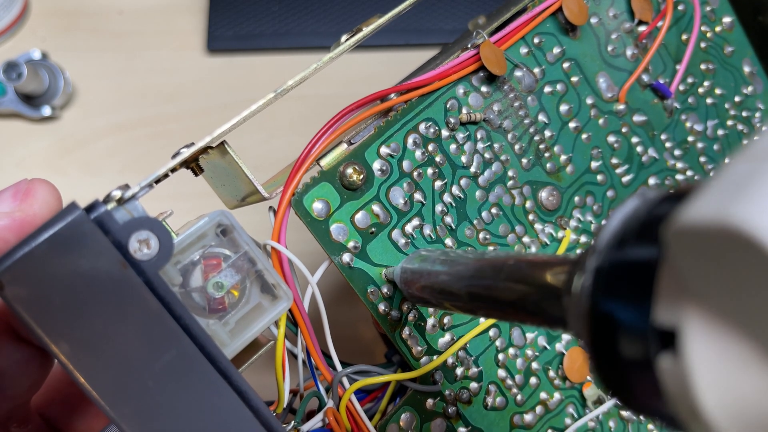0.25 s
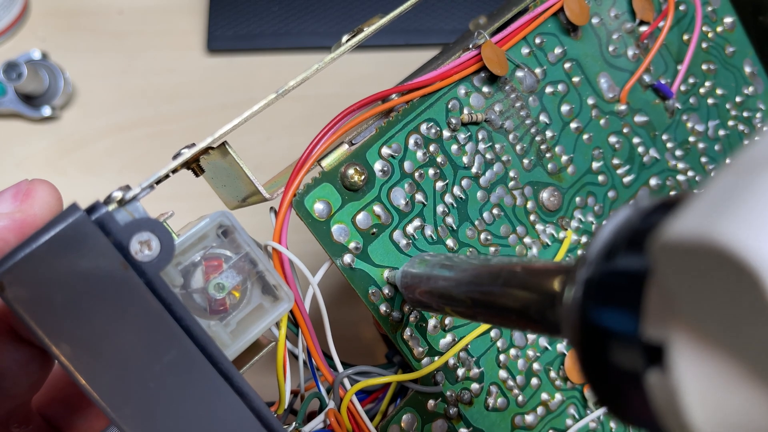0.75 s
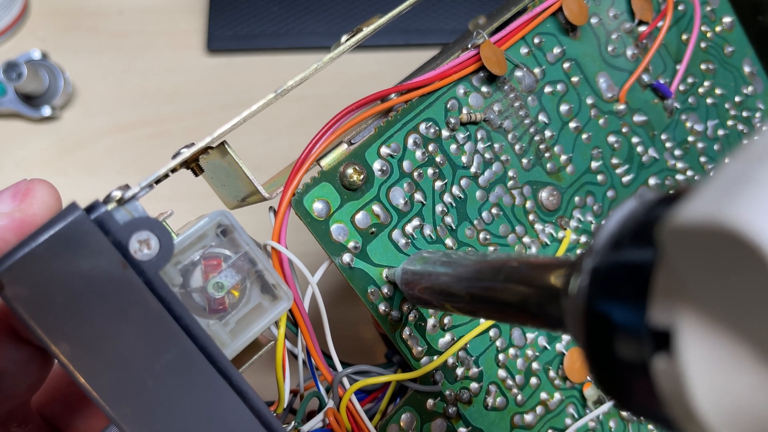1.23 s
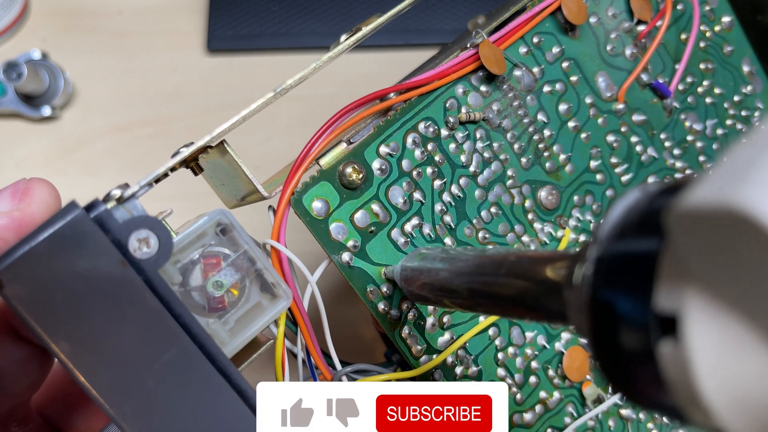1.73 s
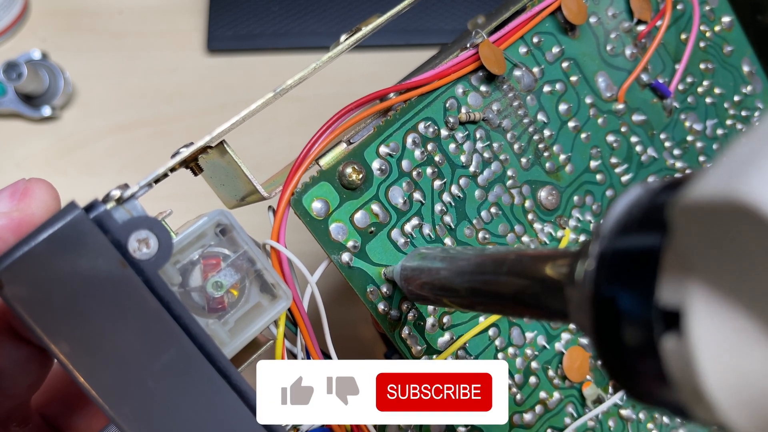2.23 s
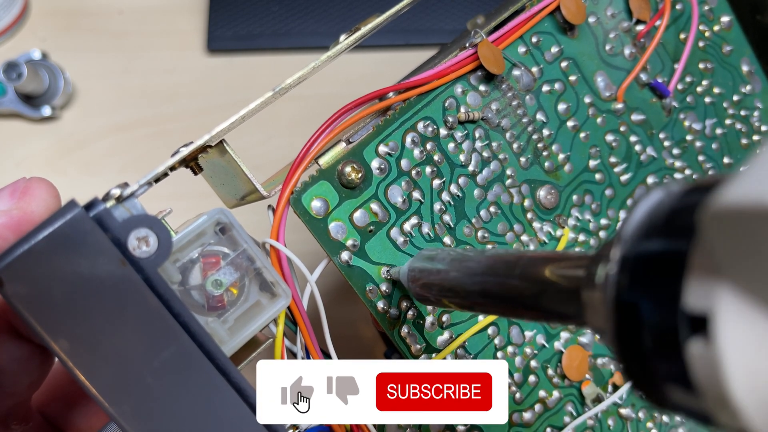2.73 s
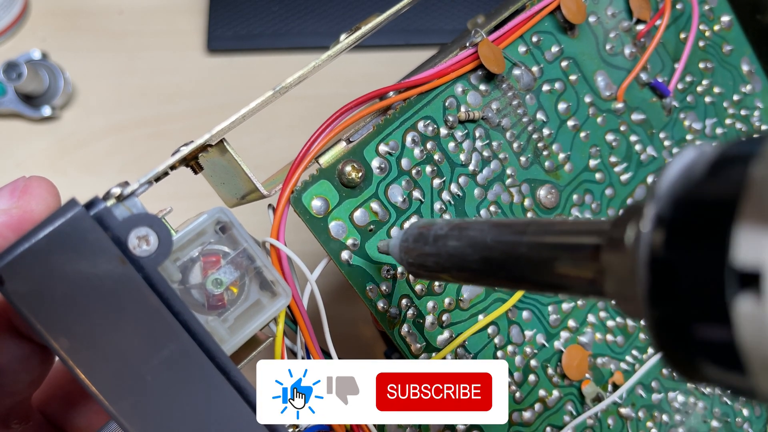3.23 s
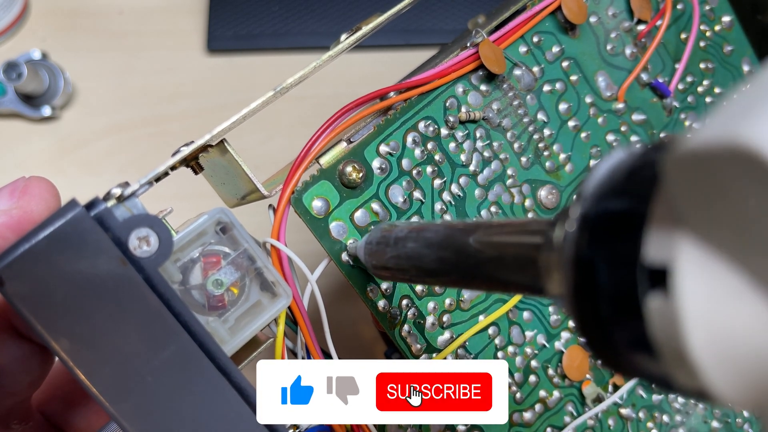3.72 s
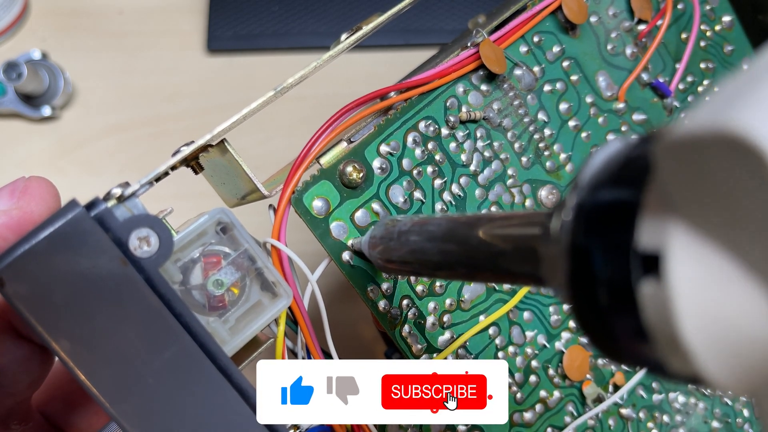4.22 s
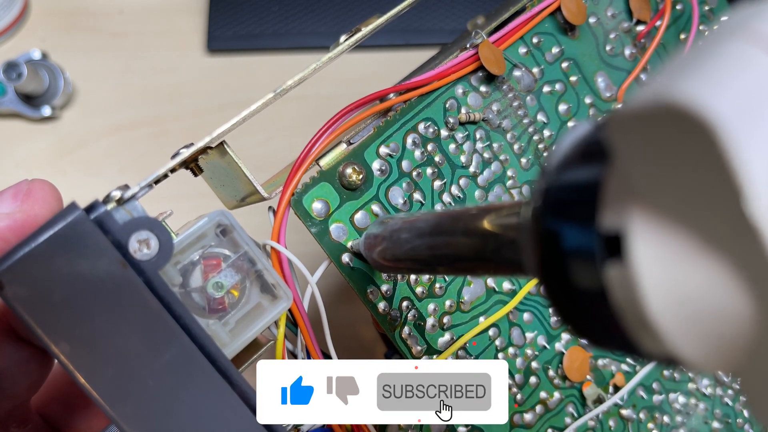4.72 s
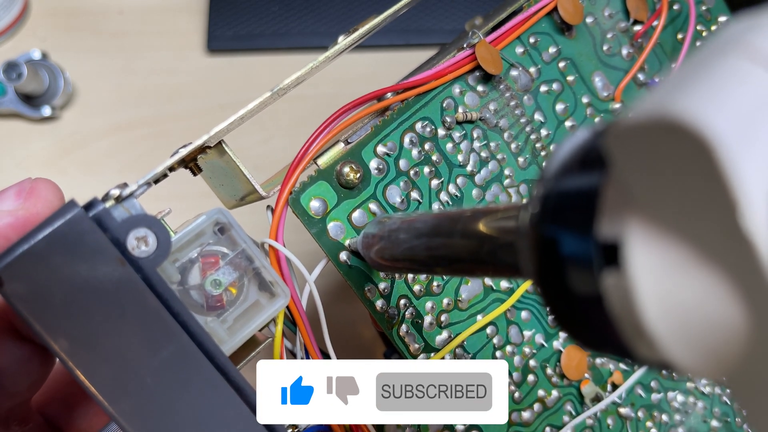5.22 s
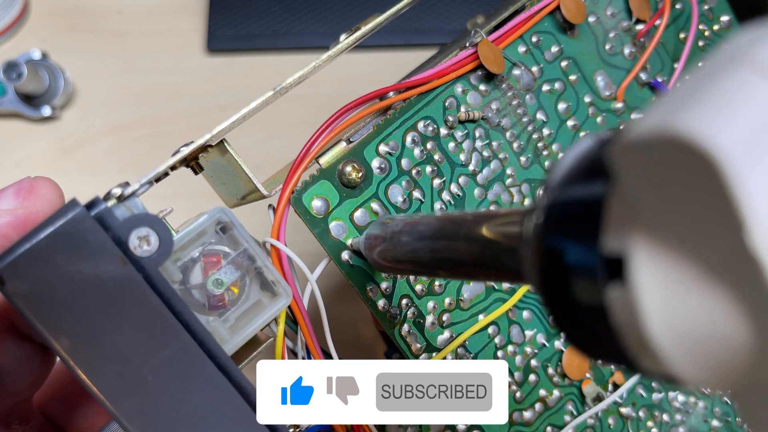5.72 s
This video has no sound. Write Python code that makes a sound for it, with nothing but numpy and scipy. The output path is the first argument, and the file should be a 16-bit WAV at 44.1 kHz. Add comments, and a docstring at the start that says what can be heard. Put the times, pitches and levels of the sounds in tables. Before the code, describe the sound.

Faint ticks on a circuit board, a short buzzing hum from a desoldering pump ending in a sharp click, then a workbench clatter.

```python
"""A desoldering gun's diaphragm pump spins up, hums, slaps its valve and sucks air through the nozzle.
The trigger snaps it on and off; molten solder gurgles and sputters, and air rushes back on release.
Before that, the tip ticks and scuffs on a circuit board, hot flux whistles and the bench knocks softly.
Later something on the bench shifts with a short clatter and light taps, and the next joint sizzles.
Under it all lies a quiet room with faint mains hum, handling rustle and a slow draught."""
import sys
import numpy as np
from scipy import signal
from scipy.fft import rfft, irfft, next_fast_len
from scipy.io import wavfile

SR = 44100
rng = np.random.default_rng(int(sys.argv[2]) if len(sys.argv) > 2 else 0)


def master_out(mix):
    """Clip the mix to full scale and print it as 16-bit PCM to the path in sys.argv[1]."""
    frames = np.transpose(np.atleast_2d(mix))
    ceiling = np.clip(frames, -1, 1)
    pcm = np.round(ceiling * 32767).astype(np.int16)
    wavfile.write(sys.argv[1], SR, pcm)


N = 262703
TIME = np.arange(N) / SR
PRESS_S, RELEASE_S = 1.431, 2.717  # the motor has power while the trigger is held


def from_db(db):
    """Decibels to gain."""
    return 10 ** (np.asarray(db) / 20)


def rms_one(x):
    """Scale to an rms of 1."""
    return x / np.sqrt(np.mean(x ** 2) + 1e-20)


def drift(rate_hz):
    """Smooth random modulation with a spread of 1."""
    hop, warm_up = 40, 2000
    pole = np.exp(-2 * np.pi * rate_hz * hop / SR)
    white = rng.standard_normal(N // hop + warm_up + 2)
    slow = signal.lfilter([1], [1, -2 * pole, pole * pole], white)[warm_up:]
    return np.interp(np.arange(N) / hop, np.arange(len(slow)), rms_one(slow))


def noise(colour):
    """Noise with the given spectrum, falling 24 dB an octave past its ends; rms 1."""
    size = next_fast_len(N)
    octave = np.log2(np.maximum(np.arange(size // 2 + 1) * SR / size, 1))
    hz, db = np.transpose(colour)
    outside = np.abs(octave - np.clip(octave, np.log2(hz[0]), np.log2(hz[-1])))
    gain = from_db(np.interp(octave, np.log2(hz), db) - 24 * outside)
    return rms_one(irfft(rfft(rng.standard_normal(size)) * gain, size)[:N])


def resonant(x, modes):
    """Noise with narrow resonances standing out of it; rms 1."""
    peaks = sum(from_db(db) * signal.lfilter(*signal.iirpeak(hz, hz / width, fs=SR), x)
                for hz, width, db in modes)
    return rms_one(x + peaks)


def ring(clicks, hz, t60_s):
    """A unit click sets a sine of height 1 ringing."""
    pole, angle = from_db(-60 / (t60_s * SR)), 2 * np.pi * hz / SR
    return signal.lfilter([0, np.sin(angle)], [1, -2 * pole * np.cos(angle), pole * pole], clicks + 1e-18)


def impulses(times, gains):
    """One click of the given height at each time."""
    return np.bincount(np.round(np.asarray(times) * SR).astype(int), gains, N)[:N]


def struck(times, db, modes):
    """Every contact rings all the modes, each with a slightly different strength."""
    scatter_db = rng.standard_normal((len(times), len(modes)))
    return sum((-1) ** k * ring(impulses(times, from_db(scatter_db[:, k] + db + mode_db)), hz, t60_s)
               for k, (hz, mode_db, t60_s) in enumerate(modes))


def dying(times, db, t60_s, rise_s):
    """Envelope of blows whose energies add up and die away."""
    blows = impulses(times, from_db(db) ** 2) + 1e-24
    energy = signal.lfilter([1], [1, -from_db(-120 / (t60_s * SR))], blows)
    attack = np.exp(-1 / (rise_s * SR))
    return signal.lfilter([1 - attack], [1, -attack], np.sqrt(energy))


def swell(centre_s, half_length_s):
    """A smooth bump of height 1 around a moment."""
    return np.exp(-((TIME - centre_s) / half_length_s) ** 2)


def swells(rows):
    """Envelope of several smooth bumps, each with its own length and level."""
    return sum(from_db(db) * swell(centre_s, half_length_s) for centre_s, half_length_s, db in rows)


def boost(centre_s, half_length_s, db):
    """A gain that rises briefly above 1."""
    return from_db(db * swell(centre_s, half_length_s))


def rising(start_s, rise_s):
    """0 until the start, then settling towards 1."""
    return 1 - np.exp(-np.maximum(TIME - start_s, 0) / rise_s)


# dark room tone: freq_hz, level_db
ROOM_COLOUR = [(60, -8), (110, -4), (150, -8), (200, -3), (270, -6.5), (360, -6.5), (440, -10),
               (650, -18.5), (950, -19.5), (1800, -22), (2150, -22.5), (2700, -28), (5000, -32.5),
               (10500, -34.5), (16000, -38)]
# resonances in the room tone: pitch_hz, width_hz, level_db
ROOM_MODES = [(708, 26, -1), (1436, 26, 0), (2000, 60, 2), (2420, 32, 0), (2950, 33, -4)]
# mains hum and two fainter tones: pitch_hz, level_db
ROOM_TONES = [(120, -66.5), (322, -71), (380, -72)]

def room(level_db=-59):
    """A bed of soft noise and hum, wavering slightly."""
    bed = from_db(level_db + 0.56 * drift(6.8)) * resonant(noise(ROOM_COLOUR), ROOM_MODES)
    for hz, db in ROOM_TONES:
        peak = np.sqrt(2) * from_db(db + 1.9 * drift(1.17))
        bed += peak * np.sin(2 * np.pi * hz * TIME + hz / 250 * drift(3))
    return bed


# hand movements: centre_s, half_length_s, level_db
HAND_MOVES = [(.75, 0.7, -61), (4.63, 0.3, -64), (5.5, 0.58, -61.5)]
# soft handling rustle: freq_hz, level_db
RUSTLE_COLOUR = [(150, -10), (350, 13), (700, -1), (1100, 1.5), (2200, -3), (3000, -5.5), (8000, -16.5)]

def rustle(grip_db=-73):
    """The resting grip rustles faintly, and more as the hands shift gun and board."""
    envelope = np.hypot(from_db(grip_db), swells(HAND_MOVES))
    return envelope * from_db(1.9 * drift(26)) * noise(RUSTLE_COLOUR)


# wafts from the moving gun: centre_s, half_length_s, level_db
WAFTS = [(.95, 0.43, -48), (1.75, 0.087, -43.5), (2.15, 0.1, -44), (5.9, .25, -48.5)]
# sub-bass air rumble: freq_hz, level_db
DRAUGHT_COLOUR = [(6, -0.5), (12, -5), (20, -9.5), (30, -18), (50, -21.5), (80, -38.5)]

def draught(level_db=-55, wander_db=2):
    """Slow air movement swells when the gun stirs the air close by."""
    envelope = np.hypot(from_db(level_db), swells(WAFTS))
    return envelope * from_db(wander_db * drift(3.9)) * noise(DRAUGHT_COLOUR)


# nozzle ticks on the joints: start_s, snap_db, ring_db
TICKS = [(0.2883, -49, -43.5), (0.295, -60, -46), (.497, -44.5, -52), (.945, -54, -74), (1.029, -56, -78),
         (2.958, -67, -54)]
# bright, dry snap, shared with the trigger: freq_hz, level_db
SNAP_COLOUR = [(1500, -1), (3000, 3), (5000, 0), (7500, 5), (11000, 3), (15500, -7)]
# tip scuffs on the board: start_s, level_db
SCUFFS = [(1.294, -58.5), (4.52, -49.5), (5.119, -49.5), (5.27, -49.5), (5.288, -52)]
# dull scuff: freq_hz, level_db
SCUFF_COLOUR = [(500, 4), (900, -7), (1500, 3), (2050, -3.5), (2900, -5.5), (4000, -8), (5000, -11.5),
                (7500, -17), (9400, -18.5), (13500, -37)]

def nozzle():
    """The tip slips on a joint with a snap and a brief ring; on the board it gives a duller scuff."""
    start_s, snap_db, ring_db = np.transpose(TICKS)
    snap = dying(start_s, snap_db, t60_s=0.015, rise_s=0.00059) * noise(SNAP_COLOUR)
    tip = ring(impulses(start_s, from_db(ring_db)), hz=2970, t60_s=0.015)
    scuff = dying(*np.transpose(SCUFFS), t60_s=0.11, rise_s=0.0022) * noise(SCUFF_COLOUR)
    return snap + tip + scuff


# thin whistles of boiling flux: start_s, length_s, first_hz, last_hz, level_db
WHISTLES = [(.37, .12, 8700, 8600, -69.5), (0.516, .32, 8750, 8550, -72), (.85, 0.19, 8450, 9300, -75),
            (.99, 0.098, 9250, 8400, -73), (1.032, 0.13, 4170, 3400, -73), (4.328, .2, 6250, 7180, -82),
            (4.55, .08, 8350, 8970, -72), (4.62, .06, 8200, 8450, -68.5), (4.74, .1, 7000, 6750, -84),
            (.68, 0.34, 4400, 4480, -76)]

def flux_whistles(tremble_depth=0.0126, flicker_db=2):
    """Flux vapour escapes from the hot joint in faint, trembling glides."""
    out = np.zeros(N)
    tremble = 1 + tremble_depth * drift(400)
    flicker = from_db(flicker_db * drift(40))
    for start_s, length_s, first_hz, last_hz, db in WHISTLES:
        span = (TIME >= start_s) & (TIME < start_s + length_s)
        along = (TIME[span] - start_s) / length_s
        hz = (first_hz + (last_hz - first_hz) * along) * tremble[span]
        arch = np.sqrt(np.abs(np.sin(np.pi * along)))
        out[span] += from_db(db) * arch * np.sin(2 * np.pi * np.cumsum(hz) / SR)
    return out * flicker


# knocks and clatter on the bench: start_s, thud_db, rattle_db
KNOCKS = [(0.422, -48, -75), (0.514, -44, -64), (0.617, -43, -78), (.945, -51, -58), (4.66, -44, -54),
          (4.683, -33, -42.5), (4.702, -33.5, -36.5), (4.71, -30.5, -46), (4.742, -37.5, -52),
          (4.776, -37.5, -55.5), (4.804, -45, -65), (5.279, -46, -56)]
# low body of board and chassis: freq_hz, level_db
THUD_COLOUR = [(40, -2), (100, -4.5), (150, 1.5), (200, 3), (270, -2.5), (330, 7), (400, -23), (510, -10),
               (650, -33)]
# their midrange rattle: freq_hz, level_db
RATTLE_COLOUR = [(550, -20), (780, 1), (1000, 0), (1300, -6), (1750, -6), (2430, -12.5), (3300, -8.5),
                 (4300, -16), (4700, -22), (8400, -24.5), (13000, -35), (15000, -43)]
# ring of loose chassis metal: pitch_hz, level_db, t60_s
CHASSIS_MODES = [(1004, -22, 0.058), (1220, 2, 0.12), (1750, 0, 0.096), (2640, -18, 0.12),
                 (2930, -27, 0.11), (3070, -5, 0.18), (3470, -9, 0.2), (3530, -20, .1), (4220, -7.5, 0.18)]

def bench_knocks(metal_db=-10.5):
    """Each knock stirs the crowded modes of board and chassis: a thud, a grainy rattle, a little ring."""
    start_s, thud_db, rattle_db = np.transpose(KNOCKS)
    thud = dying(start_s, thud_db, t60_s=0.089, rise_s=0.0031) * noise(THUD_COLOUR)
    rattle = dying(start_s, rattle_db, t60_s=0.14, rise_s=0.0032) * noise(RATTLE_COLOUR)
    metal = struck(start_s, rattle_db + metal_db, CHASSIS_MODES)
    grain = from_db(0.86 * drift(180))
    return thud + rattle * grain + metal


# switch contacts, three on press and three on release: start_s
TRIGGER_S = [1.4313, 1.432, 1.4326, 2.7169, 2.7177, 2.719]
# how hard each contact hits: level_db
TRIGGER_DB = [-49, -38, -41, -28.5, -67, -37.5]
# ring of switch and gun shell: pitch_hz, level_db, t60_s
TRIGGER_MODES = [(1790, -4, .014), (2140, -9, .009), (3460, -13, .009), (4690, -7, .012), (5150, -4, .007),
                 (6270, -5, .015), (7780, -3, .008), (8980, -3, .007), (10970, -2, .009), (12280, -5, .004),
                 (14250, -7, .005), (15400, -5, .008)]

def trigger():
    """The switch springs over, bounces and rings the shell; each contact also gives a dry crack."""
    crack = dying(TRIGGER_S, TRIGGER_DB, t60_s=0.011, rise_s=0.0001) * noise(SNAP_COLOUR)
    return struck(TRIGGER_S, TRIGGER_DB, TRIGGER_MODES) + crack


def motor_speed(top_hz=83.36, creep_hz_per_s=0.65, spin_up_s=0.044, brake_hz_per_s=350):
    """Strokes per second: a quick spin-up, a slow creep, then friction brakes evenly to rest."""
    powered = (top_hz + creep_hz_per_s * (TIME - PRESS_S)) * rising(PRESS_S, spin_up_s)
    braking = brake_hz_per_s * np.maximum(TIME - RELEASE_S, 0)
    return np.maximum(powered - braking, 0)


# harmonics of the housing's hum: stroke_multiple, level_db
HUM_HARMONICS = [(1, -14), (2, 0), (3, -8), (4, -15), (5, -15), (6, -20), (7, -24), (8, -25), (9, -7),
                 (10, -22), (11, -11), (12, -14), (13, -15), (14, -24), (15, -25), (16, -25), (17, -20),
                 (18, -19), (19, -24), (20, -23), (21, -28), (22, -24), (23, -25), (24, -24), (25, -23)]

def housing_hum(pace, strokes, level_db=-47.5, flutter=0.1, force_db=22):
    """The crank shakes the housing at multiples of its rate; the weak multiples waver most."""
    hum = 0
    multiples, levels = np.transpose(HUM_HARMONICS)
    edge_db = force_db * (pace - 1)  # a slow crank knocks softly, so the buzz is duller
    for k, db in enumerate(levels, 1):
        # the housing's resonances stay put while the higher multiples slide through them
        harmonic_db = np.interp(k * pace, multiples, levels) + edge_db if k > 2 else db
        waver = 1 + flutter * from_db(-db / 2) * drift(17)
        hum += from_db(harmonic_db) * waver * np.sin(2 * np.pi * (k * strokes + rng.random()))
    kick = boost(centre_s=1.508, half_length_s=0.017, db=6)  # the motor takes up the load
    return from_db(level_db) * pace ** 1.82 * kick * hum * np.sqrt(2)


# resonances of valve and pump chamber: pitch_hz
VALVE_HZ = [2268, 2350, 2430, 2601]
# how each one rings: level_db, t60_s
VALVE_RING = [(-2, .07), (3, .038), (-1, .07), (-12, .115)]

def valve_slap(pace, strokes, level_db=-51.5, uneven_db=0.75, chamber_band_hz=(2176, 2620)):
    """Valve and chamber are struck once a stroke, each resonance at its own point of the turn."""
    force = from_db(uneven_db * drift(40))
    rings = 0
    for hz, (db, t60_s) in zip(VALVE_HZ, VALVE_RING):
        slaps = np.diff(np.floor(strokes + rng.random()), prepend=0)
        rings += from_db(db) * ring(force * slaps, hz, t60_s)
    rings = signal.sosfilt(signal.butter(2, chamber_band_hz, "band", fs=SR, output="sos"), rings)
    running = (TIME > 2) & (TIME < 2.5)
    strain = boost(centre_s=1.657, half_length_s=0.12, db=5.3)  # until the joint is clear
    return from_db(level_db) * pace ** 2.6 * strain * rings / np.std(rings[running])


def airflow(strokes, puff_depth=0.08, flutter_db=0.84, hold_s=0.074, t60_s=0.062):
    """Envelope of the air: it puffs once a stroke, holds briefly after release, then dies away."""
    flow = from_db(-60 * np.maximum(TIME - RELEASE_S - hold_s, 0) / t60_s)
    puffs = 1 + puff_depth * np.cos(2 * np.pi * strokes)
    return flow * puffs * from_db(flutter_db * drift(90))


# broad suction hiss: freq_hz, level_db
SUCTION_COLOUR = [(300, 5.5), (1000, 0), (2000, 1.5), (2800, -1), (3100, -4), (3700, -4.5), (5000, -4.5),
                  (6500, -5.5), (8600, -5), (9800, -6), (11000, -6.5), (12000, -10.5), (15500, -9)]
# resonances of the suction tube: pitch_hz, width_hz, level_db
TUBE_MODES = [(4790, 98, -16), (5460, 130, -7), (6920, 56, 4), (7200, 49, -18), (7620, 45, 2),
              (7860, 40, -6), (8470, 270, -1.5), (8900, 70, -3), (10500, 81, -3), (11000, 60, -14),
              (15000, 110, -5)]
GULP_S, GULP_HALF_LENGTH_S = 1.598, 0.026

def suction(pace, flow, level_db=-54):
    """Air hisses up the tube, swelling as the molten solder is gulped down."""
    gulp = boost(GULP_S, GULP_HALF_LENGTH_S, db=4.8)
    hiss = resonant(noise(SUCTION_COLOUR), TUBE_MODES)
    return from_db(level_db) * pace ** 2 * gulp * flow * hiss


# sputters of solder: centre_s, half_length_s, level_db
SPUTTERS = [(1.6, 0.066, -60.5), (2.0, .05, -66), (2.3, 0.046, -59), (2.46, 0.052, -60), (2.67, 0.037, -62)]

def sputter():
    """Solder sputters in the nozzle in narrow, fluttering bands of noise."""
    colour = [(3000, -17), (3100, 6), (3180, -8.5)]  # freq_hz, level_db
    return swells(SPUTTERS) * from_db(2 * drift(53)) * noise(colour)


def gurgle(level_db=-51):
    """The gulp of solder gurgles in the barrel."""
    colour = [(650, -8), (760, 4), (900, -9), (1060, 5), (1200, -17)]  # freq_hz, level_db
    return from_db(level_db) * swell(GULP_S, GULP_HALF_LENGTH_S) * noise(colour)


# bright hiss of returning air: freq_hz, level_db
VENT_COLOUR = [(1760, -38), (3000, -6), (6040, -18), (8340, 1.5), (9660, -5), (10400, 5), (11800, -12),
               (14800, 2), (16000, -24)]

def vent(flow, level_db=-52):
    """After release, air rushes back for a moment."""
    return from_db(level_db) * rising(RELEASE_S, rise_s=0.004) * flow * noise(VENT_COLOUR)


def pump(running_hz=84, coast_db_per_s=37):
    """One crank drives hum, valve and air; hum and slap fade once the power is off."""
    speed = motor_speed()
    pace = speed / running_hz
    strokes = np.cumsum(speed * (1 + 0.0007 * drift(12))) / SR
    mechanism = housing_hum(pace, strokes) + valve_slap(pace, strokes)
    coasting = from_db(-coast_db_per_s * np.maximum(TIME - RELEASE_S, 0))
    flow = airflow(strokes)
    return coasting * mechanism + suction(pace, flow) + sputter() + vent(flow) + gurgle()


def sizzle(start_s=5.72, level_db=-64.5):
    """Flux fries in fine grains as the next joint melts."""
    colour = [(3000, -1.8), (9000, 0), (15500, -0.14)]  # freq_hz, level_db
    return rising(start_s, rise_s=0.039) * from_db(level_db + 1.7 * drift(300)) * noise(colour)


def reflections(x, wet_db=-13.5, t60_s=0.29, predelay_s=0.002):
    """A short diffuse tail from the bench and walls."""
    t = TIME[:SR // 2]
    tail = rng.standard_normal(len(t)) * from_db(-60 * t / t60_s) * (t > predelay_s)
    return from_db(wet_db) * signal.fftconvolve(x, tail / np.linalg.norm(tail))[:N]


def scene():
    """The gun close up, the bench and the room around it, in mono."""
    clicks = trigger() + nozzle()
    gun = pump() + clicks + reflections(clicks)
    board = bench_knocks() + sizzle() + flux_whistles()
    ambience = room() + rustle() + draught()
    return (gun + board + ambience)[None]


def record(dry, cutoff_hz=15750):
    """The highest treble is cut steeply."""
    return signal.sosfilt(signal.ellip(10, 0.1, 70, cutoff_hz, fs=SR, output="sos"), dry)


dry = scene()
out = record(dry)
master_out(out)
```